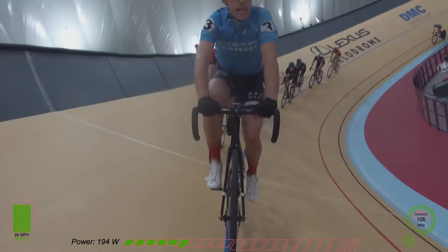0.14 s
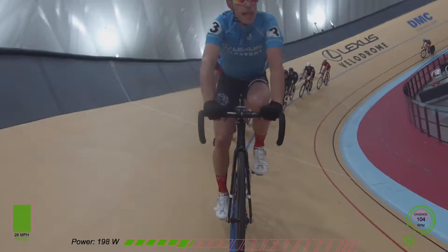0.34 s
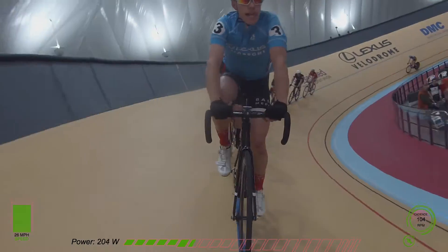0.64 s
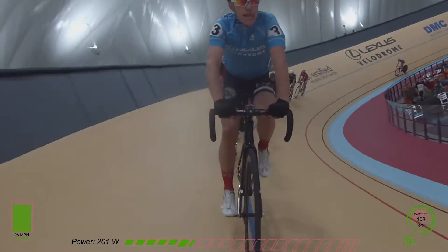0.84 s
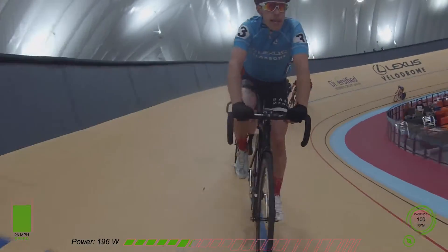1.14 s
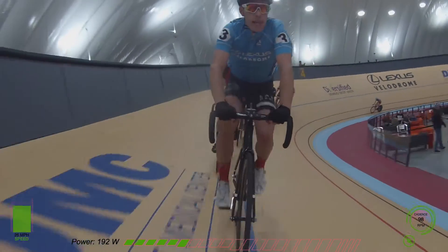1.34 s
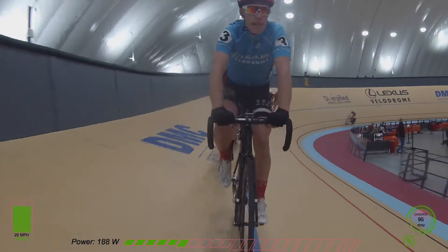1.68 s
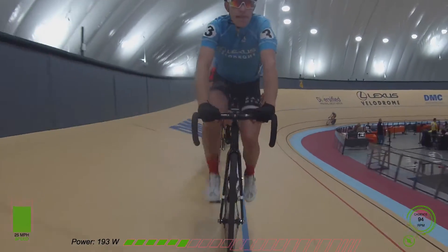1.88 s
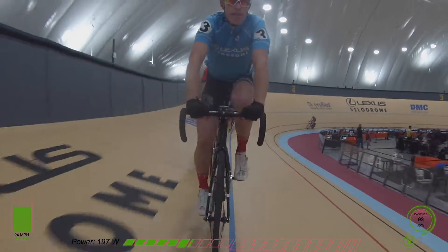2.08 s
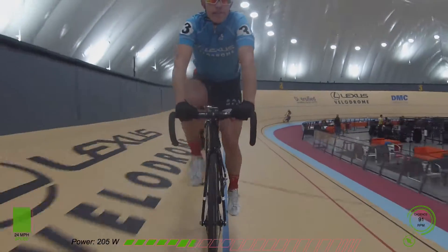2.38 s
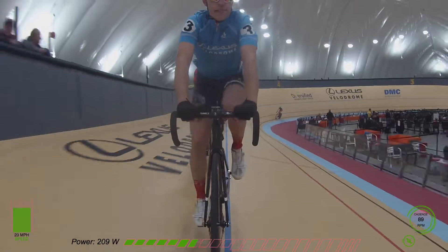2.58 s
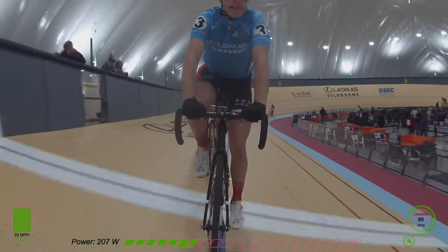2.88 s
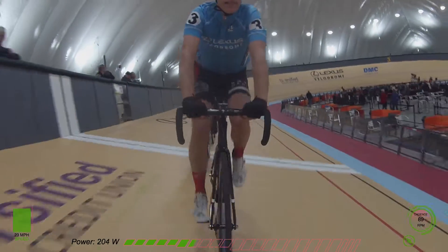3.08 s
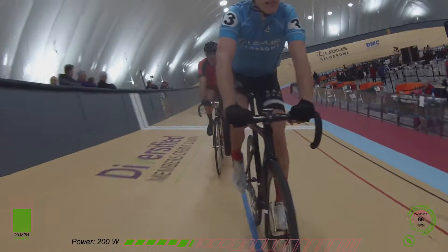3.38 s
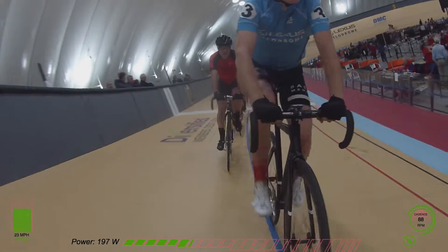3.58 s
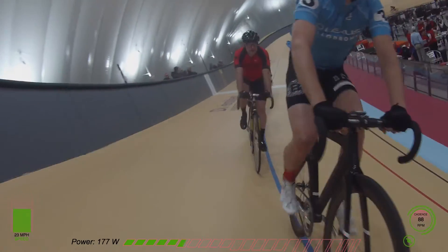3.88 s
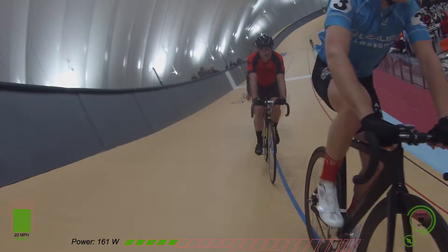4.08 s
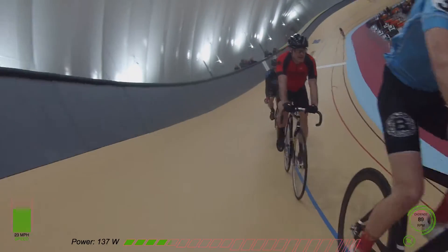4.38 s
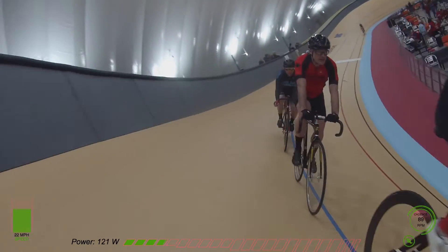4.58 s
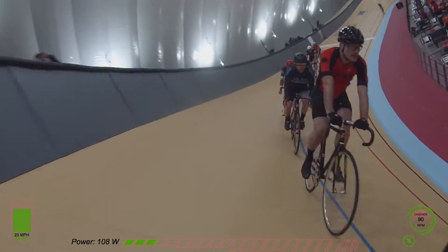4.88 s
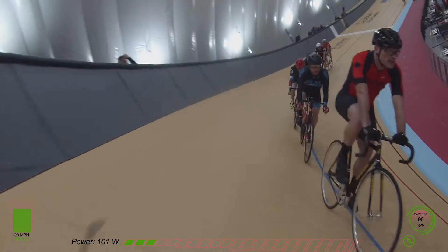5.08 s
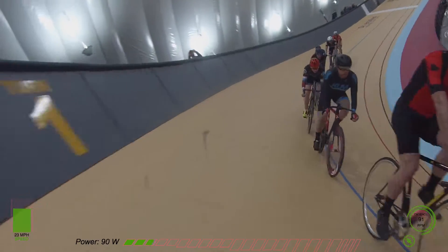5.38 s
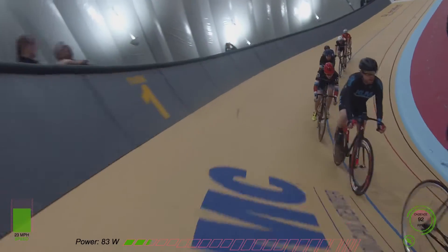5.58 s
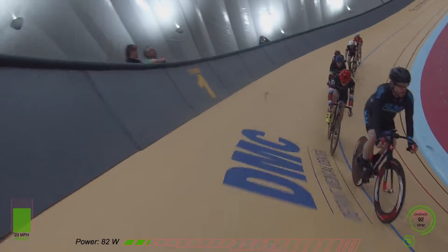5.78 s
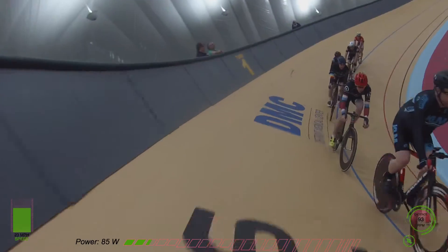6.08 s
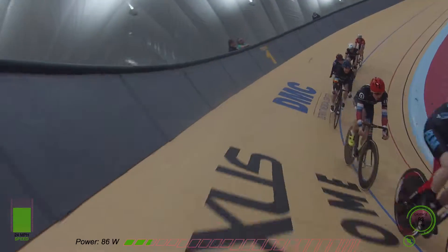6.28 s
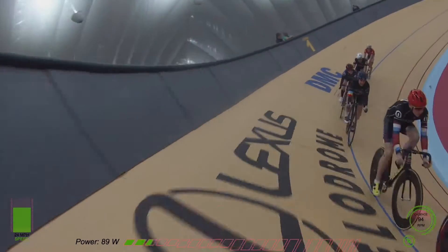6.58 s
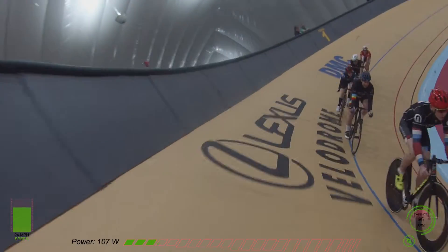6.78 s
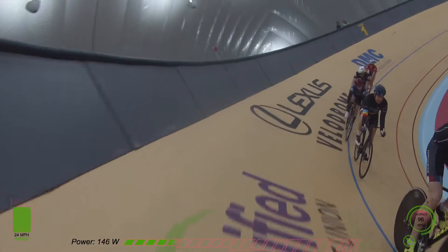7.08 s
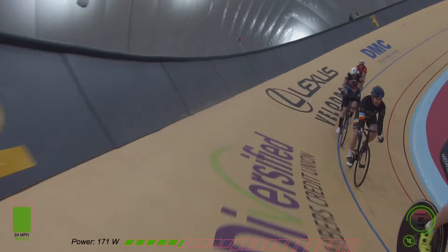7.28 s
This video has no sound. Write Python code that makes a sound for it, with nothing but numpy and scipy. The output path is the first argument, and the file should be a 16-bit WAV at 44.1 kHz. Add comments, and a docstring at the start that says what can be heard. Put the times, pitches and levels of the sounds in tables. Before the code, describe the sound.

Thumping, fluttering wind gusts over a rapid chain buzz and steady tyre rumble, with occasional sharp metallic snaps and clacks from a bicycle.

```python
"""A bicycle chain on an indoor wooden track, heard by the microphone of a camera clamped to the bicycle.
Each link that seats on the sprocket is a blow with a short rattle, which rings steel, frame and camera mount.
Under it the tyres roar as coloured noise; wind adds thumping and fluttering noise, puffs and pressure kicks.
A few hard snaps and loose clacks stand out. Sudden dips lower the chain and tyres, and the wind less."""
import sys
import numpy as np
from scipy import signal
from scipy.fft import rfft, irfft, next_fast_len
from scipy.io import wavfile
from scipy.ndimage import uniform_filter1d, map_coordinates

SR = 44100
rng = np.random.default_rng(int(sys.argv[2]) if len(sys.argv) > 2 else 0)


def wav_out(sig):
    """Save sig, one row per channel (or a flat mono array), as 16-bit PCM at SR to the path in sys.argv[1]."""
    wavfile.write(sys.argv[1], SR, np.round(np.clip(np.atleast_2d(sig).T, -1, 1) * 32767).astype(np.int16))


N = 328545  # length in samples

# Steady airstream on the microphone port between gusts: (time [s], buffet level [dB])
CALM_WIND = [(0, -15.5), (.1, -18.5), (.4, -19.5), (.6, -17), (.72, -18.5), (1.25, -16.5), (2.34, -18.5),
             (2.65, -17), (3.01, -19.5), (3.3, -18.5), (3.55, -19), (4.15, -16.5), (4.55, -20.5),
             (4.85, -20), (5.12, -22.5), (5.48, -16.5), (6.3, -15.5), (7.16, -18), (7.45, -15)]
# Gusts, each starting halfway up its rise:
# (start [s], length [s], buffet level [dB], flutter level [dB])
GUST_EVENTS = [(0.16, 0.11, -13, -27), (0.296, 0.04, -10, -17.5), (0.78, 0.15, -15, -21),
               (1.112, 0.075, -16, -23.5), (1.364, 0.026, -15, -24), (1.439, 0.036, -15.5, -16),
               (1.543, 0.19, -13, -24.5), (1.932, 0.14, -14.5, -26.5), (2.23, 0.12, -16.5, -25.5),
               (2.353, 0.052, -11, -26), (2.443, 0.11, -14.5, -20), (2.737, 0.017, -11, -35),
               (2.832, 0.078, -18.5, -33), (2.907, 0.039, -19, -18.5), (3.04, 0.12, -11, -26),
               (3.192, 0.057, -18.5, -25), (3.404, 0.074, -13.5, -23.5), (3.633, 0.18, -17, -26.5),
               (4.021, 0.061, -11.5, -25), (4.143, 0.101, -14.5, -26), (4.302, 0.071, -12.5, -22.5),
               (4.397, 0.049, -14, -28), (4.659, 0.054, -15.5, -21), (4.745, 0.018, -7.5, -15),
               (4.907, 0.075, -15.5, -19.5), (5.018, 0.02, -14, -21.5), (5.277, 0.04, -14.5, -24.5),
               (5.336, 0.048, -19.5, -30), (5.476, 0.023, -28, -38), (5.533, 0.089, -22, -25.5),
               (5.655, 0.062, -21, -23), (5.76, 0.087, -28, -27), (5.888, 0.16, -13, -23),
               (6.052, 0.035, -17.5, -45), (6.376, 0.13, -15.5, -29), (6.57, 0.069, -18, -25.5),
               (6.675, 0.042, -15.5, -23.5), (6.787, 0.06, -23, -25), (6.899, 0.043, -11.5, -34),
               (6.97, 0.052, -16, -27), (7.39, 0.06, -14, -40)]
CALM_FLUTTER_DB = -9.5  # flutter of the steady stream against its buffet
GUST_RISE_S, GUST_FALL_S = 0.022, 0.027
# Colour of the low thumping and of the higher flutter: (frequency [Hz], relative level [dB])
BUFFET_SPECTRUM = [(9, -43), (15, -1.5), (43, 3), (90, 2), (140, -2.5), (220, -13.5), (400, -59.5)]
FLUTTER_SPECTRUM = [(80, -80), (170, 0), (300, -7), (450, -11.5), (800, -15), (1500, -34), (3000, -57)]
# Single eddies that slap the port: (time [s], relative level [dB])
PUFF_EVENTS = [(0.194, -17), (0.221, -11), (0.243, -10.5), (0.304, -21), (0.525, -21), (0.604, -15.5),
               (0.627, -17), (0.82, -13), (0.875, -11.5), (0.915, -17), (1.074, -12), (1.392, -18),
               (1.537, -12), (1.955, -21), (1.992, -11), (2.291, -27), (2.471, -11.5), (2.535, -13.5),
               (2.919, -14.5), (2.94, -20), (3.052, -14.5), (3.082, -19), (3.131, -14), (3.201, -12),
               (3.384, -19), (3.669, -15), (3.741, -17), (3.927, -16.5), (4.299, -13.5), (4.755, -31),
               (4.801, -26), (4.914, -19), (5.035, -26), (5.526, -24), (5.93, -16), (5.965, -19),
               (6.445, -17)]
# Colour of a slap: (frequency [Hz], relative level [dB])
PUFF_SPECTRUM = [(100, -12), (250, -0.5), (500, -8.0), (900, -12.5), (1400, -27), (3000, -64)]
PUFF_PEAK_S = 0.0055  # a slap swells for this long, then fades
# Lone pressure kicks on the port: (time [s], peak level [dB])
KICK_EVENTS = [(.197, -12), (.236, -15), (.831, -3.5), (.878, -6), (0.921, -7), (1.996, -12), (2.543, -6.5),
               (2.667, -14), (5.982, -10)]
KICK_S = 0.0017  # from the middle of a kick to where its pressure changes sign
# Sudden dips in level that creep back: (time [s], depth [dB], recovery time constant [s])
LEVEL_DIPS = [(.29, 4.5, 0.11), (.86, 4, 0.35), (.99, 2, 0.12), (2.543, 9, 0.16), (2.668, 5, 0.11),
              (3.03, 8, 0.045), (3.26, 3.5, .08), (4.78, 0, 0.17), (6.0, 7.5, 0.13)]
DIP_FALL_S = 0.01
WIND_DIPS_LESS = 0.61  # share of a dip, in dB, that the wind follows
STEEL_DIPS_MORE = 1.2  # the same share for the steel ticks of the chain
# Colour of the tyre roar: (frequency [Hz], relative level [dB])
TYRE_SPECTRUM = [(250, -7.5), (500, -5.5), (800, 4), (1060, 4), (1210, -1.5), (1450, -9), (2500, -11),
                 (5000, -15), (8000, -39), (11000, -58), (15000, -70)]
# Loose parts that clack once: (time [s], starting level [dB], pitch [Hz])
CLACK_EVENTS = [(2.059, -18, 3020), (2.461, -23, 6030), (7.017, -15, 2770)]
CLACK_T60_S = 0.014  # time to fade by 60 dB
# Resonances of frame, steel and camera mount: (frequency [Hz], width [Hz], relative level [dB])
FRAME_MODES = [(2668, 79, 1.5), (3145, 86, -1), (3355, 70, -5.5), (3813, 140, 1.5), (4177, 81, 2.5),
               (4480, 73, -2.5), (4876, 154, -6), (5030, 15, -9.5), (5324, 39, -9), (5600, 520, -15.5),
               (5950, 45, -9), (6175, 57, -6.5), (6560, 23, -14.5), (6930, 82, -17.5)]
STEEL_MODES = [(7720, 51, -8), (8390, 55, -3.5), (8670, 200, -0.5), (8900, 255, -2.5), (9740, 37, -17),
               (9880, 60, -1.5), (9970, 270, -2), (10450, 80, -17), (12200, 80, -13), (12400, 150, -19),
               (12360, 80, -8), (12400, 120, -14)]
MOUNT_MODES = [(1399, 23.4, -14), (1742, 74, -8), (1857.4, 37.6, -3.5), (1895, 28, 0.5), (2129, 30.6, -2.5),
               (2142.5, 24, -6), (2183, 65, -9), (2394, 220, -18.5)]
# Links that snap home hardest: (time [s], relative steel blow [dB], relative frame and mount blow [dB])
HARD_SNAPS = [(0.19, -24, -11.5), (0.364, -26.5, -16), (0.437, -26, -11.5), (0.4822, -26, -18),
              (0.505, -27, -13), (0.5263, -25, -13), (0.5492, -23, -13), (0.677, -29, -23),
              (0.9405, -25, -18.5), (1.222, -24, -17), (1.371, -23, -12.5), (1.597, -40, -24),
              (1.689, -21, -11), (1.7444, -27, -13.5), (1.8088, -29, -10), (1.9712, -22, -12.5),
              (2.0523, -26, -10.5), (2.188, -24, -11), (2.2298, -30, -13.5), (2.3805, -22, -11),
              (2.4593, -20, -15.5), (3.1025, -32, -18), (3.2524, -26, -16), (3.4054, -25, -12.5),
              (3.5896, -18, -13.5), (3.9098, -21.5, -11), (3.9682, -20, -21), (4.3808, -27, -13),
              (4.535, -24, -12.5), (4.788, -25, -28), (5.0364, -24, -15), (5.142, -27, -11.5),
              (5.167, -23.5, -15.5), (5.3122, -27, -13), (5.338, -21, -10), (5.5245, -21, -12.5),
              (5.6885, -24, -11), (6.0263, -27, -17), (6.2463, -26, -13.5), (6.354, -23, -13),
              (6.8576, -31, -20), (7.016, -28, -23), (7.1687, -28, -16), (7.3795, -16, -10.5),
              (7.4215, -24, -12.5)]
FRAME_LAG_S = .0015  # a blow takes this long to build up in frame and mount
# Basic levels of the bicycle; the hush lowers the mount when the chain hangs loose:
# (time [s], frame ring [dB], steel tick against frame [dB], tyres [dB], mount hush [dB])
BIKE_LEVELS = [(0, -29.5, -18, -28.5, 9), (.5, -31, -14.5, -28.5, 2), (.8, -30.5, -15.5, -29.5, 4),
               (1.2, -29.5, -18, -28, 9.5), (1.5, -29.5, -15.5, -28, 3), (2.0, -31, -16, -29.5, 10),
               (2.5, -33, -17, -29.5, 4), (2.7, -32.5, -13, -30.5, 2.5), (3.2, -31.5, -17.5, -30, 6.5),
               (3.8, -32.5, -16, -30, 3), (3.95, -29.5, -14.5, -26.5, 5.5), (4.65, -30.5, -16, -27.5, 5),
               (4.75, -32.5, -18, -30.5, 2.5), (5.2, -33.5, -13.5, -30, 6), (5.55, -29, -17.5, -26, 8),
               (5.97, -29, -16.5, -26, 1), (6.3, -30.5, -14, -27, 5.5), (6.9, -31, -16, -27.5, 4.5),
               (7.45, -33, -18, -25.5, 1)]
# Pedalling speed: (time [s], chain over the sprocket [links per s])
CHAIN_SPEED = [(0, 84.83), (.5, 86.29), (1.2, 88.6), (2.4, 87.71), (3.6, 86.02), (4.4, 79.88), (5.2, 75.85),
               (5.6, 74.11), (6.4, 73.08), (7, 73.8), (7.45, 75.61)]
FIRST_LINK = -.35  # where the chain stands at the start, in links
CHAINRING_TEETH, SPROCKET_TEETH = 50, 15
# Uneven drive, links come early and late once a crank turn, pedal stroke and sprocket turn:
# (period [links], lead [links], phase [turns])
UNEVEN_DRIVE = [(CHAINRING_TEETH, .082, .21), (CHAINRING_TEETH / 2, .068, .308),
                (SPROCKET_TEETH, .088, .344)]
# Out-of-round wheels tighten the chain once a turn: (period [links], swell [dB], phase [turns])
CHAIN_TIGHTNESS = [(CHAINRING_TEETH, 0.61, 0.19), (SPROCKET_TEETH, 0.49, 0.3)]
# The housing dulls the treble: (frequency [Hz], gain [dB])
HOUSING_RESPONSE = [(9000, -0.5), (11500, -5.5), (13200, -9), (14000, -21), (14600, -15), (15300, -30)]
TOP_HZ = 15200  # nothing is kept from here up


def amp(db):
    """Turn a level in dB into a gain."""
    return 10 ** (np.asarray(db) / 20)


def unit(x):
    """Scale x to an average strength (rms) of 1."""
    return x / np.sqrt(np.mean(x ** 2) + 1e-20)


def curves(rows):
    """Join the points of each column after the time into one value per sample."""
    s, *columns = np.transpose(rows)
    return [np.interp(np.arange(N) / SR, s, column) for column in columns]


def wobble(rate):
    """Draw a smooth random curve with rate points a second, at most 80."""
    points = rng.standard_normal(int(N * 80 / SR) + 4)
    return map_coordinates(points, [np.arange(N) * min(rate, 80) / SR])


def along(points, hz):
    """Read the gain from (Hz, dB) points joined on a log frequency axis."""
    f, db = np.transpose(points)
    return amp(np.interp(np.log(hz + 1), np.log(f), db))


def filtered(x, response):
    """Multiply the spectrum of x by a response, which is a function of frequency."""
    m = next_fast_len(N + SR // 2)
    hz = np.fft.rfftfreq(m, 1 / SR)
    return irfft(rfft(x, m) * response(hz), m)[:N]


def rush(spectrum, patchy_db):
    """Make coloured noise whose gain varies in random patches of time and pitch."""
    z = signal.stft(rng.standard_normal(N + 512), nperseg=512)[2]
    patches = uniform_filter1d(rng.standard_normal(z.shape), size=6, axis=0)
    patches = uniform_filter1d(patches, size=10, axis=1)
    noise = signal.istft(z * amp(patchy_db * unit(patches)), nperseg=512)[1][:N]
    return filtered(noise, lambda hz: along(spectrum, hz))


def ring(force, modes):
    """Shake a body with a force: each resonance passes a narrow band, with alternating sign."""
    def response(hz):
        total = 0
        for k, (center, width, db) in enumerate(modes):
            damping = 1j * hz * width
            total = total + (-1) ** k * amp(db) * damping / (center ** 2 - hz ** 2 + damping)
        return total
    return filtered(force, response)


def knocks(times, sizes, t60, blow=1.0):
    """At each time make a sharp blow of force and a rough rattle that fades 60 dB in t60 seconds."""
    spikes = np.bincount(np.clip((times * SR).astype(int), 0, N - 1), sizes, N)
    fade = amp(-60 * np.arange(SR // 20) / SR / t60)
    rattle = signal.fftconvolve(spikes, fade)[:N] * rng.standard_normal(N)
    return blow * spikes + rattle


def turning(links, rows):
    """Add up (period, size, phase) cosines along the chain, as turning wheels cause them."""
    return sum(size * np.cos(2 * np.pi * (links / period - phase)) for period, size, phase in rows)


def dips():
    """Gain of the level dips: a quick fall, then an exponential return."""
    depth_db = np.zeros(N)
    for s, db, recovery in LEVEL_DIPS:
        since = np.maximum(np.arange(N) / SR - s, 0)
        depth_db += db * np.minimum(since / DIP_FALL_S, 1) * np.exp(-since / recovery)
    return amp(-depth_db)


def gusts():
    """Buffet and flutter gains: gusts rise, hold and fall, and their power adds to the steady stream."""
    calm_db, = curves(CALM_WIND)
    power = amp(2 * np.array([calm_db, calm_db + CALM_FLUTTER_DB]))  # doubled dB give power
    for s, length, buffet_db, flutter_db in GUST_EVENTS:
        hold = max(length - GUST_RISE_S, 0)
        corners = np.cumsum([s - GUST_RISE_S / 2, GUST_RISE_S, hold, GUST_FALL_S])
        shape = np.interp(np.arange(N) / SR, corners, [0, 1, 1, 0])
        power += amp(2 * np.array([[buffet_db], [flutter_db]])) * shape ** 2
    return np.sqrt(power)


def wind():
    """Eddies thump the port; the strongest ones reach higher as a lumpy flutter."""
    buffet_gain, flutter_gain = gusts()
    eddies = wobble(22)
    buffet = unit(amp(0.88 * eddies) * rush(BUFFET_SPECTRUM, patchy_db=-0.36))
    lumps_db = 1.07 * eddies + 2.0 * wobble(45)
    flutter = unit(amp(lumps_db) * rush(FLUTTER_SPECTRUM, patchy_db=0.0))
    return buffet_gain * buffet + flutter_gain * flutter


def puffs():
    """A slap of air: a short swell of flutter that reaches up to the tyre roar."""
    s, db = np.transpose(PUFF_EVENTS)
    u = np.arange(SR // 10) / SR / PUFF_PEAK_S
    swell = u * np.exp(1 - u)  # 1 at its peak
    spikes = np.bincount((s * SR).astype(int), amp(db - 3.5), N)
    slap = rush(PUFF_SPECTRUM, patchy_db=-2.0)
    return signal.fftconvolve(spikes, swell)[:N] * unit(slap)


def kicks():
    """One suck of air with a weak rebound on either side."""
    out, t = np.zeros(N), np.arange(N) / SR
    for s, db in KICK_EVENTS:
        u = (t - s) / KICK_S
        out -= amp(db) * (1 - u * u) * np.exp(-u * u / 2)
    return out


def tyres():
    """Rubber rolling over the wooden boards: coloured noise that swells and fades at random."""
    roll_db = curves(BIKE_LEVELS)[2]
    return amp(roll_db) * unit(amp(1.8 * wobble(11)) * rush(TYRE_SPECTRUM, patchy_db=1.0))


def clacks():
    """A loose part clacks: a short damped ring, roughened by noise."""
    out, t = np.zeros(N + SR), np.arange(SR // 10) / SR
    for s, db, hz in CLACK_EVENTS:
        rough = 1 + 1.04 * unit(uniform_filter1d(rng.standard_normal(len(t)), size=24))
        start = round(s * SR)
        out[start:start + len(t)] += amp(db - 60 * t / CLACK_T60_S) * rough * np.sin(2 * np.pi * hz * t)
    return out[:N]


def snaps():
    """The hardest links strike the same steel, frame and mount."""
    s, steel_db, frame_db = np.transpose(HARD_SNAPS)
    steel = ring(knocks(s, amp(steel_db + 12.5), t60=0.0051, blow=4.0), STEEL_MODES)
    shake = knocks(s + FRAME_LAG_S, amp(frame_db), t60=0.038, blow=7.5)
    return steel + amp(4.0) * ring(shake, FRAME_MODES) + amp(19.5) * ring(shake, MOUNT_MODES)


def chain():
    """Each link strikes its tooth at its own strength; rollers rub between the strikes."""
    frame_db, steel_db, _, hush_db = curves(BIKE_LEVELS)
    s = np.arange(N) / SR
    even = FIRST_LINK + np.cumsum(curves(CHAIN_SPEED)[0]) / SR  # links passed by a perfectly even drive
    tight_db = turning(even, CHAIN_TIGHTNESS)
    passed = even + turning(even, UNEVEN_DRIVE)

    link = np.arange(1, int(passed[-1]) + 1)
    timing, strength, steel_extra, mount_extra = rng.standard_normal((4, len(link)))
    # contact comes a little before the link lies flat
    seated = np.interp(link - .15 + 0.036 * timing, passed, s)
    snapped = np.abs(seated[:, None] - np.transpose(HARD_SNAPS)[0]).min(axis=1) < .004
    strength_db = 3.05 * np.minimum(strength, 1.6) - 60 * snapped  # those links are struck by snaps()

    stroke = 2 * passed / CHAINRING_TEETH  # two pedal strokes a crank turn
    # near 1 with the cranks upright, when the chain hangs loose
    slack = np.exp(1.65 * (np.cos(2 * np.pi * (stroke - .39)) - 1))

    frame_rub, mount_rub, steel_rub = rng.standard_normal((3, N))
    late = seated + FRAME_LAG_S
    frame_blows = knocks(late, amp(0.95 * strength_db), t60=0.023, blow=2.4)
    mount_blows = knocks(late, amp(0.63 * strength_db + 1.0 * mount_extra), t60=0.016, blow=3.6)
    steel_blows = knocks(seated, amp(strength_db + 0.51 * steel_extra), t60=0.007, blow=3.5)
    frame_force = unit(frame_blows) + amp(-4.5) * frame_rub
    mount_force = unit(mount_blows) + amp(-8.5) * mount_rub
    steel_force = unit(steel_blows) + amp(-10.0) * steel_rub

    frame = amp(-1.13 * slack + 2.03 * wobble(20)) * unit(ring(frame_force, FRAME_MODES))
    mount = amp(6.5 - hush_db * slack) * unit(ring(mount_force, MOUNT_MODES))
    steel_gain = amp(steel_db + 1.1 * tight_db + 2.4 * wobble(21))
    steel_gain = steel_gain * dips() ** (STEEL_DIPS_MORE - 1)  # scene() applies the first full dip
    steel = steel_gain * unit(ring(steel_force, STEEL_MODES))
    return amp(frame_db + tight_db) * (frame + mount + steel)


def scene():
    """Everything reaches one microphone; puffs, kicks, snaps and clacks are left out of the dips."""
    air = puffs() + kicks() + dips() ** WIND_DIPS_LESS * wind()
    bicycle = dips() * (tyres() + chain()) + snaps() + clacks()
    return (air + bicycle)[None]


def record(dry):
    """The input rounds off the tallest peaks; the housing dulls the treble up to the band limit."""
    soft = dry[0] / (1 + np.abs(dry[0] / .98) ** 6) ** (1 / 6)
    return filtered(soft, lambda hz: along(HOUSING_RESPONSE, hz) * (hz < TOP_HZ))[None]


dry = scene()
out = record(dry)
wav_out(out)
```